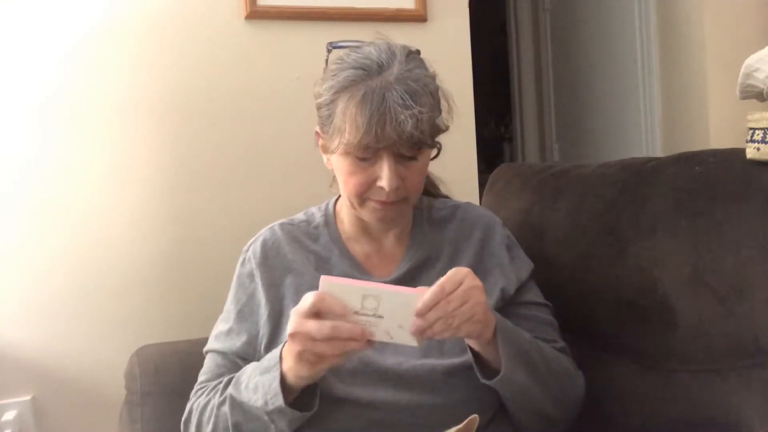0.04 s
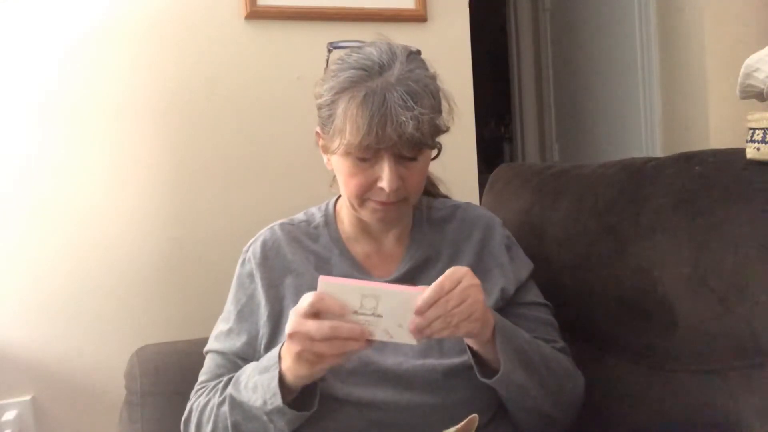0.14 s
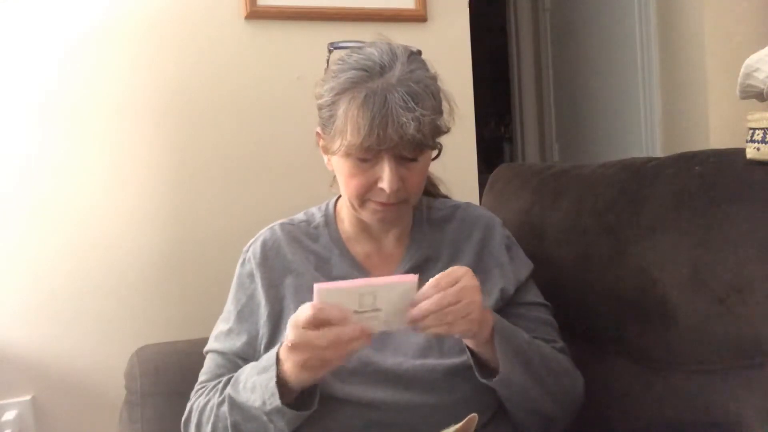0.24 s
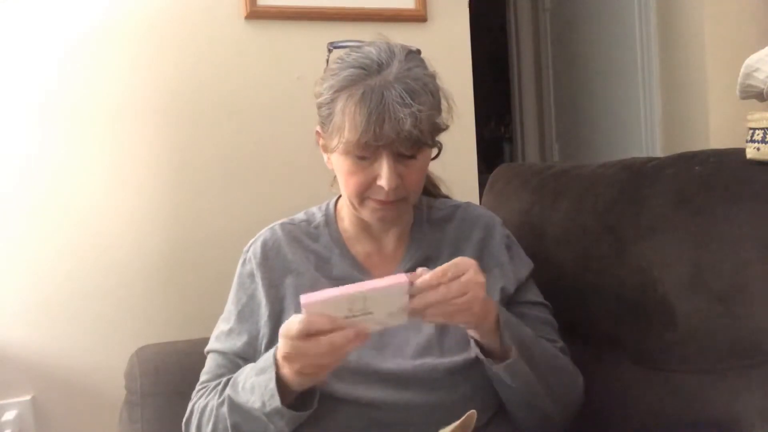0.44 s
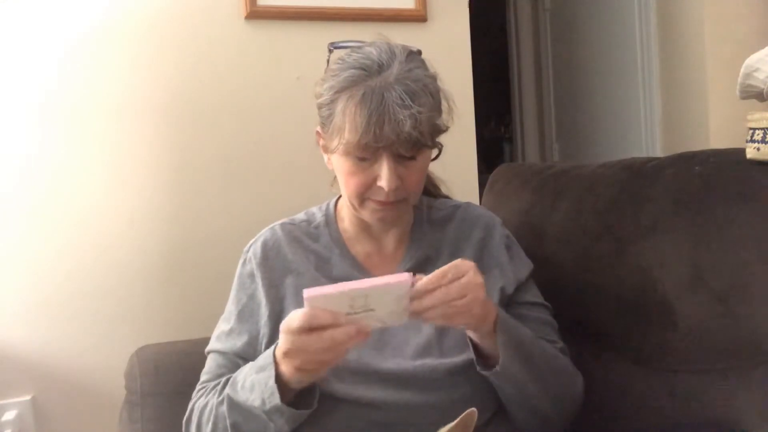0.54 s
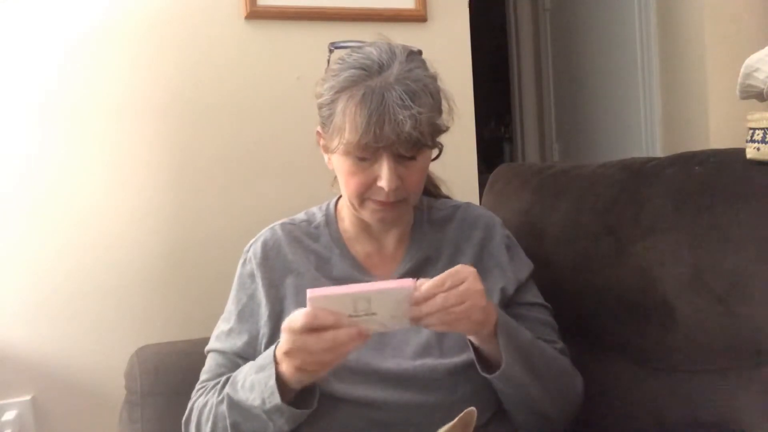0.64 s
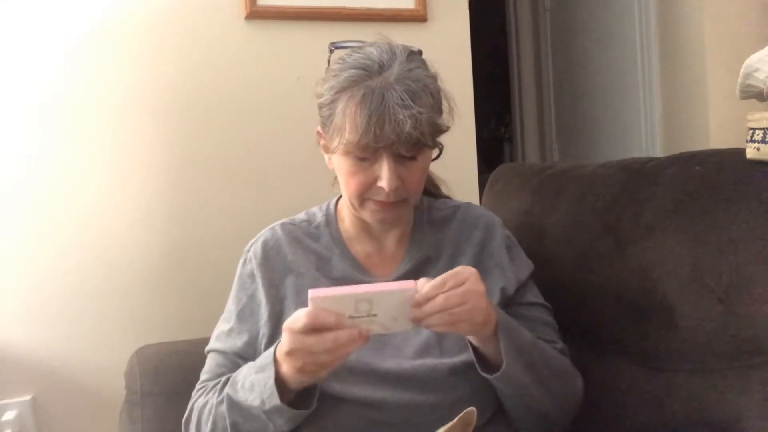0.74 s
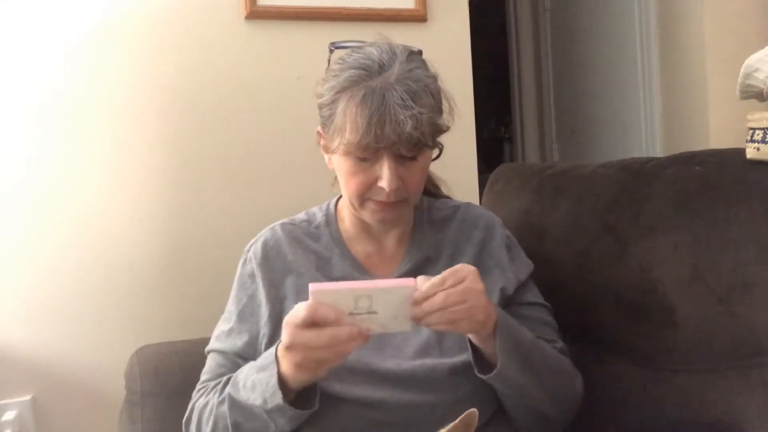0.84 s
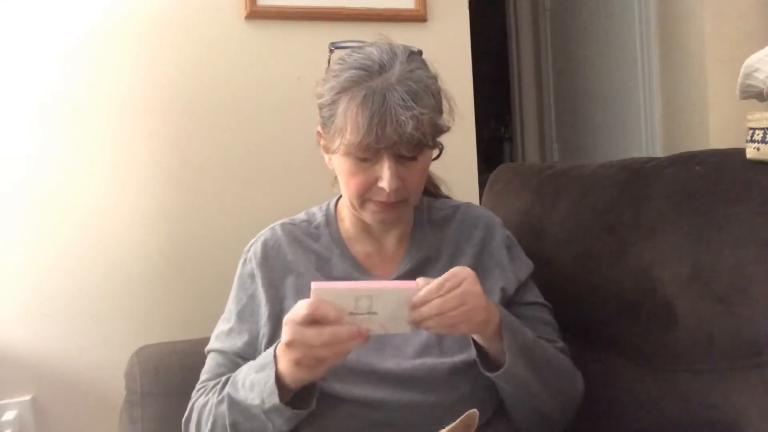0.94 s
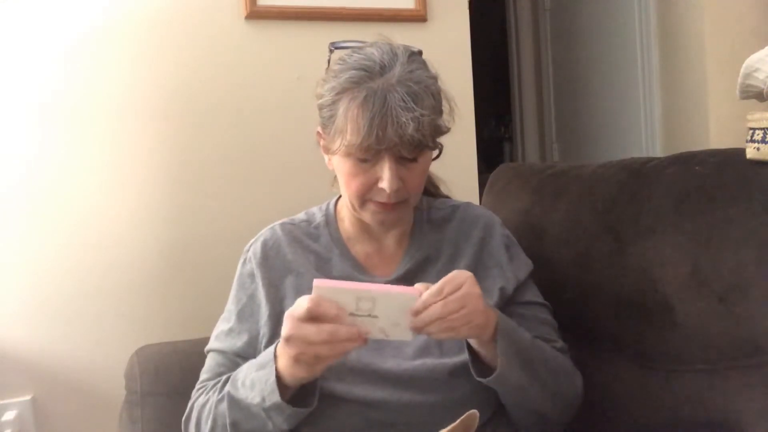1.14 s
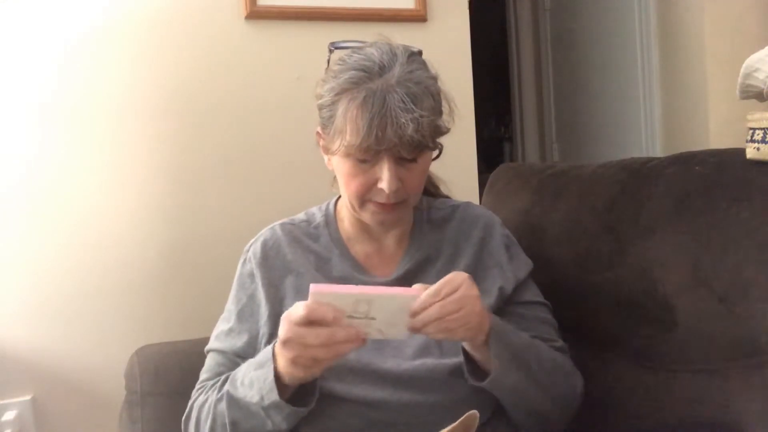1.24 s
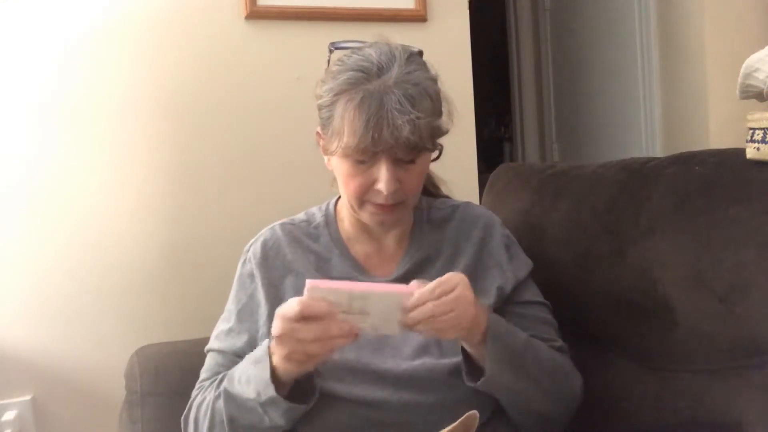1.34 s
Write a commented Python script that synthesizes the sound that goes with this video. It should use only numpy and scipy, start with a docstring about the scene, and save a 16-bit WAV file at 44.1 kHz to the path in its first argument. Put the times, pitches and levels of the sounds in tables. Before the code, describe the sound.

Fingers on a light card box: one loud crisp snap, tiny taps, a weaker closing click

```python
"""Small cardboard box, handled

Fingers and nails work at the flap in a quiet, furnished room. Snaps and taps: scattered cracks through
resonant card plus a box thud. Sliding skin: dense random grains. Nail ticks: decaying high noise bands.
The walls answer with a short frequency-dependent tail, over air noise, low hum and rumble."""
import sys
import numpy as np
from scipy import signal
from scipy.fft import rfft, irfft, next_fast_len
from scipy.io import wavfile

SR = 44100
rng = np.random.default_rng(int(sys.argv[2]) if len(sys.argv) > 2 else 0)


def volts(x):
    """Linear amplitude factor 10**(x/20) for a level x in dB, scalar or array-like."""
    e = np.asarray(x, float) / 20
    return 10 ** e


def wav_out(sig):
    """Save sig, one row per channel (or a flat mono array), as 16-bit PCM at SR to the path in sys.argv[1]."""
    wavfile.write(sys.argv[1], SR, np.round(np.clip(np.atleast_2d(sig).T, -1, 1) * 32767).astype(np.int16))


N = 61739  # length [samples]

# flap snaps and finger taps: (time [s], crack level [dB], centre [Hz], arrival spread [s],
# body thud re crack [dB], treble shelf [dB])
SNAPS = [(.2158, -27.5, 2940, 0.0058, -16.5, 0), (.2251, -12.5, 5230, 0.0032, -8, -10),
         (.2323, -34, 5230, 0.0049, 4, 1.5), (.4075, -50.5, 1510, .002, 0.5, -7),
         (.619, -57, 1500, 0.00192, -2, -8), (0.722, -58.5, 1600, 0.00125, 12, -11),
         (.752, -40.5, 4240, .0025, 2.5, -14), (.981, -55.5, 3140, 0.0015, -12, -7),
         (1.038, -57.5, 2500, .004, 0, -12.5), (1.2535, -57, 3640, 0.0032, -27, -1),
         (1.291, -32, 2880, .0045, -12, -3), (1.3005, -47, 3530, 0.0048, -33, -6),
         (1.312, -48.5, 3940, 0.0044, -3.5, -19), (1.337, -47, 2960, 0.00356, -19, -18)]
# nail ticks: (time [s], peak [dB], centre [Hz])
TICKS = [(.928, -46, 14500), (.9305, -57, 10500)]
# skin sliding on card: (start [s], swell [s], hold [s], fade t60 [s], rms before envelope [dB], centre [Hz])
RUBS = [(.209, 0.021, 0.0038, 0.04, -38, 3900), (0.224, .004, .002, .01, -31.5, 4300),
        (0.427, 0.018, .015, 0.036, -69.5, 4030), (0.617, 0.0091, 0.0085, .15, -71.5, 3920),
        (0.68, 0.015, 0.039, 0.063, -66.5, 3800), (.73, 0.021, 0.016, 0.057, -62.5, 5100),
        (0.938, 0.0047, 0.034, .04, -65.5, 3600), (1.04, 0.0043, 0.007, 0.063, -77, 3530),
        (1.154, 0.0081, 0.0045, 0.043, -75.5, 3720), (1.247, 0.0041, 0.023, 0.13, -63, 2990),
        (1.272, 0.019, 0.0025, 0.055, -43, 4170), (1.32, 0.024, 0.01, 0.067, -64.5, 2780)]
# card panel resonances: (frequency [Hz], width [Hz], relative level [dB])
CARD_MODES = [(1885, 600, -0.5), (2500, 100, -29.5), (3500, 150, -6), (4300, 150, -2), (6050, 230, -11.5),
              (6880, 270, -17.5), (7720, 180, -9.5), (11800, 240, -23)]
# hollow body resonances: (frequency [Hz], width [Hz], relative level [dB])
BODY_MODES = [(192, 56, -1), (310, 41, 4), (443, 110, -1.5), (574, 76, 1), (760, 83, 5), (1082, 161, 4),
              (1346, 190, 4)]
# wall answer decay: (frequency [Hz], t60 [s])
ROOM_T60 = [(200, .35), (600, 0.23), (1500, 0.37), (2800, 0.28), (4300, 0.35), (6000, 0.26), (8000, 0.32),
            (15000, 0.14)]
# wall answer initial colour: (frequency [Hz], relative level [dB])
ROOM_COLOUR = [(200, 0.5), (700, 0), (1300, -2.5), (2800, -0.5), (4400, 0), (6000, -1.5), (8000, -2.5),
               (15000, 3)]
# room floor spectrum: (frequency [Hz], relative density [dB per Hz])
AIR_SPECTRUM = [(15, -59.5), (30, -34), (87, -9.5), (166, -9.5), (217, -6), (317, -1.5), (394, -6.5),
                (575, -8), (936, -13), (2110, -22.5), (4500, -25), (7710, -26.5), (8500, -32), (15000, -31),
                (16000, -39.5)]
# wavering hum: (frequency [Hz], resonance width before squaring [Hz], rms before swell [dB])
HUM_BANDS = [(59.5, 2, -73), (114, 10, -74.5), (235.6, 21, -75.5), (315.7, 10, -73.5)]
# gain of hum and rumble: (time [s], gain [dB])
HUM_SWELL = [(0, -1), (.45, -0.5), (.82, 0), (1.02, 2), (1.06, -7.5), (1.2, -2), (1.28, -3), (1.4, 0.5)]

BAND_WIDTH_RATIO = 1.23  # broad card band: width over centre
TREBLE_HZ = 7710  # shelf midpoint
CARD_RING_DB, RUB_RING_DB, FAR_RING_DB = -1, 1, -8.5  # panel ringing: direct snap, sliding, snap to walls
EDGE_RATIO, EDGE_DB = 0.2, -5  # sharp leading edge: share of arrival spread, level
BASS_LAG_S = 0.000708  # bending-wave lag scale, near 1 kHz
LEAD_SAMPLES = 64  # room ahead of the snap impulse
GRAINS_PER_S, GRAIN_SPREAD_DB = 9000, 3
RUB_TREBLE_DB = -6.5
TICK_T60_S, TICK_WIDTH_HZ = 0.011, 4000  # width of each of two cascaded resonances
ROOM_DB, ROOM_DELAY_S = -10.5, 0.006
AIR_DB = -66.5
RUMBLE_HZ, RUMBLE_DB = 62, -69.5  # rms before swell
TOP_HZ = 15800


def snaps():
    """Sharp edge and ragged burst crack through card and thud the hollow body; each meets the walls anew."""
    out = np.zeros(N)
    blow = signal.unit_impulse(SR // 20, LEAD_SAMPLES)
    for start_s, level_db, centre_hz, spread_s, thud_db, treble_db in SNAPS:
        def thin(f):
            """Second-order bass cut."""
            return 1 / (1 + 0.25 * centre_hz / (1j * f + 1)) ** 2

        def burst(f):
            """Leading edge plus the longer scatter."""
            return volts(EDGE_DB) * ragged(f, EDGE_RATIO * spread_s) + ragged(f, spread_s)

        def body(f):
            """Edge-driven body modes, dulled above half the centre."""
            return ragged(f, EDGE_RATIO * spread_s) * modes(f, BODY_MODES) / (1 + 2j * f / centre_hz)

        def scaled(x, db):
            """Set energy over the arrival spread, with an 8 dB offset."""
            return volts(db - 8) * x / np.sqrt(np.sum(x ** 2) / (spread_s * SR))

        crack = filtered(blow, lambda f: burst(f) * thin(f) * card(f, centre_hz, treble_db, CARD_RING_DB))
        # the walls get a plain unscattered snap with weaker panel ringing
        far = filtered(blow, lambda f: thin(f) * card(f, centre_hz, treble_db, FAR_RING_DB))
        thud = scaled(filtered(blow, body), level_db + thud_db)
        onset_s = start_s - LEAD_SAMPLES / SR
        add(out, onset_s, scaled(crack, level_db) + thud)
        add(out, onset_s, room(scaled(far, level_db) + thud))
    return out


def rubs():
    """Dense fibre grains of uneven size swell, hold and fade through the card."""
    out = np.zeros(N)
    t = np.arange(SR // 4) / SR
    for start_s, swell_s, hold_s, t60_s, level_db, centre_hz in RUBS:
        chance, side, size = rng.random((3, len(t)))
        size_gain = volts(-GRAIN_SPREAD_DB * np.log(size + 1e-2))
        grains = (chance < GRAINS_PER_S / SR) * np.sign(side - 0.5) * size_gain

        def through_card(f):
            """Card response narrowed by one more resonance."""
            return card(f, centre_hz, RUB_TREBLE_DB, RUB_RING_DB) * peak(f, centre_hz, 1.4 * centre_hz)

        rise = np.clip(t / swell_s, 0, 1) ** 1.1
        fade = volts(-60 * np.clip(t - swell_s - hold_s, 0, 1) / t60_s)
        add(out, start_s, volts(level_db) * rise * fade * unit(filtered(grains, through_card)))
    return out


def ticks():
    """A nail catching an edge: brief decaying noise in a very high band."""
    out = np.zeros(N)
    t = np.arange(SR // 50) / SR
    for start_s, peak_db, centre_hz in TICKS:
        noise = rng.standard_normal(len(t)) * volts(-60 * t / TICK_T60_S)
        tick = filtered(noise, lambda f: peak(f, centre_hz, TICK_WIDTH_HZ) ** 2)
        add(out, start_s, volts(peak_db) * tick / np.abs(tick).max())
    return out


def card(f, centre_hz, treble_db, ring_db):
    """Broad band with the panels ringing on it and a treble shelf."""
    shelf = volts(treble_db / (1 + (TREBLE_HZ / (f + 1)) ** 10))
    ringing = 1 + volts(ring_db) * modes(f, CARD_MODES)
    return peak(f, centre_hz, BAND_WIDTH_RATIO * centre_hz) * ringing * shelf


def ragged(f, spread_s):
    """Crack whose frequencies arrive scattered in time, with extra bending-wave lag for the low ones."""
    knots_hz = np.arange(0, SR / 2, 350)
    scatter_s = spread_s * np.interp(f, knots_hz, rng.random(len(knots_hz)) ** 1.5)
    lag_s = scatter_s + BASS_LAG_S * np.sqrt(1000 / (f + 300))
    return np.exp(-2j * np.pi * np.cumsum(lag_s) * f[1])  # phase integrates group delay


def room(x):
    """Wall answer: delayed noise tail, each frequency dying at its own speed."""
    hz, t, z = signal.stft(rng.standard_normal(SR // 2), SR, nperseg=256)
    decay_db = -60 * t / along(ROOM_T60, hz)[:, None]
    z = z * volts(along(ROOM_COLOUR, hz)[:, None] + decay_db)
    tail = signal.istft(z, SR, nperseg=256)[1]
    delayed = np.pad(x, (round(ROOM_DELAY_S * SR), 0))
    return volts(ROOM_DB) * signal.fftconvolve(delayed, tail / np.linalg.norm(tail))[:N]


def hush():
    """Steady air and microphone noise, plus narrow wavering hum bands and a rumble that swell together."""
    air = volts(AIR_DB) * unit(filtered(rng.standard_normal(N), lambda f: volts(along(AIR_SPECTRUM, f))))
    hum = np.zeros(N)
    for hz, width_hz, db in HUM_BANDS + [(RUMBLE_HZ, RUMBLE_HZ, RUMBLE_DB)]:
        band = filtered(rng.standard_normal(N), lambda f: np.abs(peak(f, hz, width_hz)) ** 2)
        hum += volts(db) * unit(band)
    swell_db = np.interp(np.arange(N) / SR, *np.transpose(HUM_SWELL))
    return air + hum * volts(swell_db)


def unit(x):
    """Scale to rms 1."""
    return x / np.sqrt(np.mean(x ** 2) + 1e-20)


def along(points, hz):
    """Interpolate (frequency [Hz], value) points on a log axis."""
    f, v = np.transpose(points)
    return np.interp(np.log(hz + 1), np.log(f + 1), v)


def filtered(x, response):
    """Apply a complex frequency response to x."""
    m = next_fast_len(len(x) + 8192)
    return irfft(rfft(x, m) * response(np.fft.rfftfreq(m, 1 / SR)), m)[:len(x)]


def peak(f, hz, width_hz):
    """One causal resonance, unity at its centre."""
    return 1j * f * width_hz / (hz * hz - f * f + 1j * f * width_hz)


def modes(f, table):
    """Parallel resonances of alternating sign."""
    return sum((-1) ** k * volts(db) * peak(f, hz, w) for k, (hz, w, db) in enumerate(table))


def add(out, start_s, x):
    """Mix x into out at start_s."""
    part = out[round(start_s * SR):][:len(x)]
    part += x[:len(part)]


def scene():
    """Box, wall answer and room floor; ticks feed the walls at about half level."""
    rub, tick = rubs(), ticks()
    return (snaps() + rub + tick + room(rub + 0.49 * tick) + hush())[None]


def roll_off(x):
    """The treble ends steeply here."""
    return signal.sosfilt(signal.butter(12, 16590, fs=SR, output="sos"), x)


def record(dry):
    """Top band limit: 20 dB down from TOP_HZ up."""
    mix = filtered(dry[0], lambda f: np.where(f < TOP_HZ, 1, volts(-20)))[None]
    return roll_off(mix)


dry = scene()
out = record(dry)
wav_out(out)
```